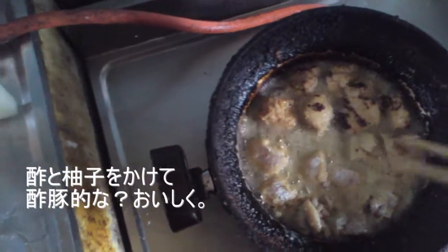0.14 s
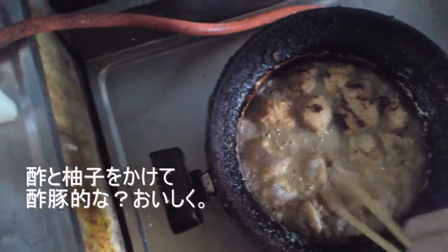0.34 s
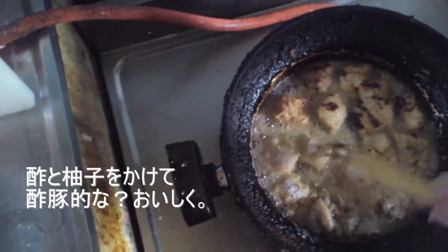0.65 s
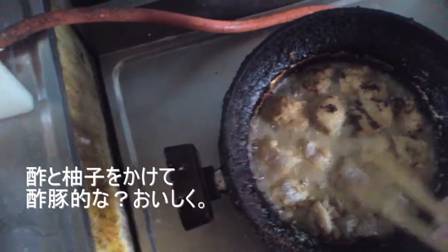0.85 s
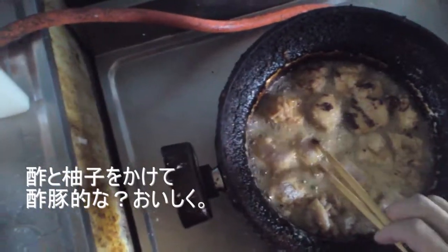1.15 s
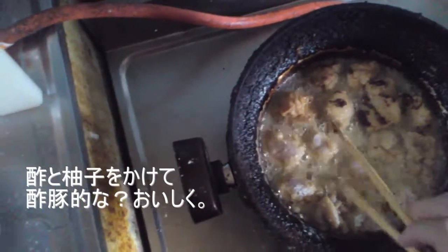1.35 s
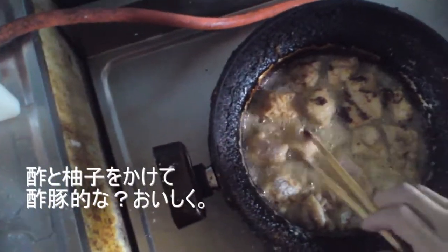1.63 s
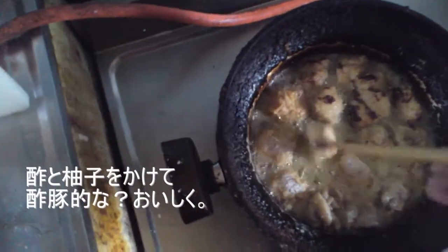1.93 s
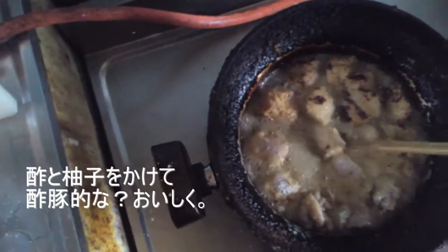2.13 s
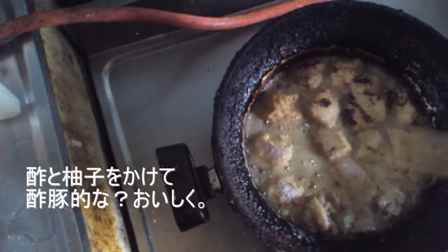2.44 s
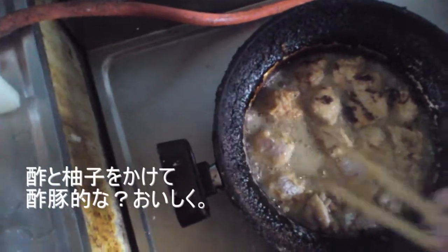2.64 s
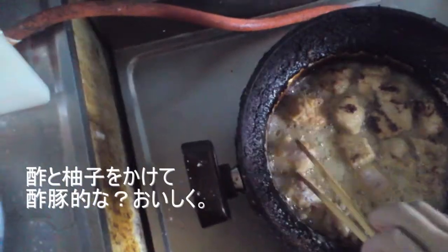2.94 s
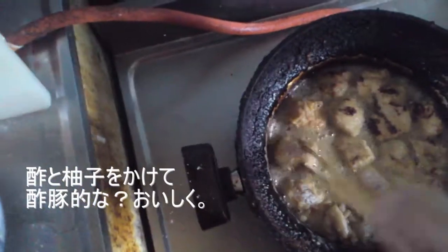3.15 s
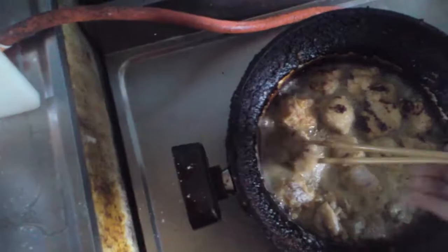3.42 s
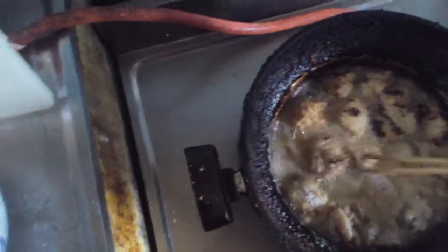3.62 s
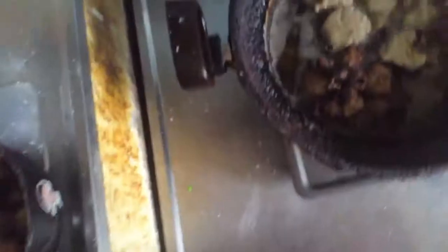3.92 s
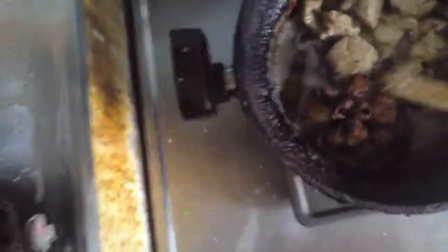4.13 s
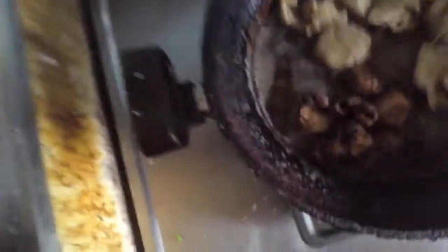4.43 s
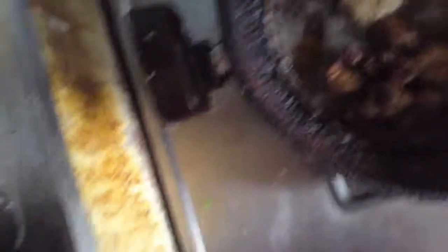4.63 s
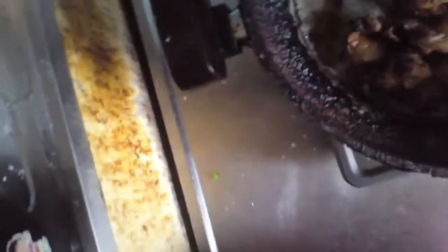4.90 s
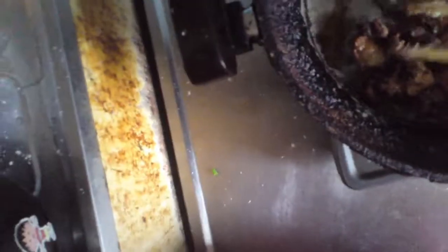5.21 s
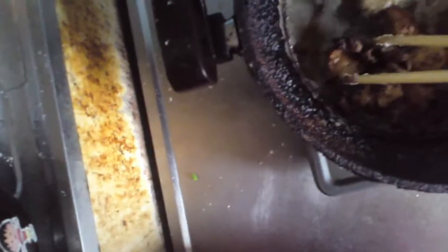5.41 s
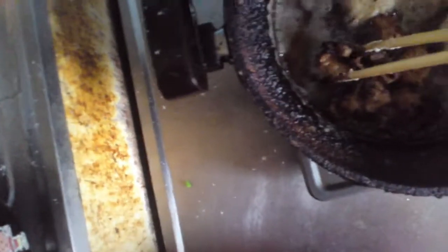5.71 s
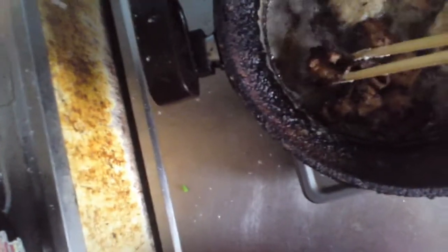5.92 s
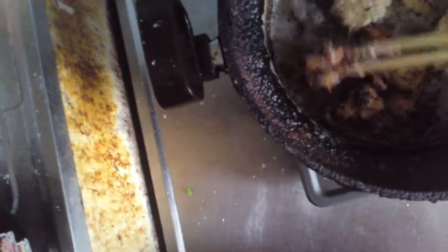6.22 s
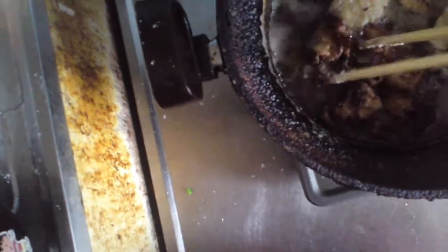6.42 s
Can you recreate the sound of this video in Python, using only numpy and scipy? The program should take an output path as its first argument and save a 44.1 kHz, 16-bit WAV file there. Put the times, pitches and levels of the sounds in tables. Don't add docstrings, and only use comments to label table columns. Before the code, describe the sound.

Battered chicken pieces fry in a pot of hot oil, heard close in a small kitchen. A dense, smooth, steady fizz runs first, with soft low bumps and small knocks from the hand holding the camera. It stops abruptly for about half a second of silence, then a rougher, louder boil enters, with clumped crackle, ringing bubble pops, sharp spits and faint plastic crinkles. Handheld camera microphone, nearly mono, dull at the very top.

```python
import sys
import numpy as np
from scipy import signal
from scipy.io import wavfile
from scipy.ndimage import uniform_filter1d

SR = 44100
rng = np.random.default_rng(int(sys.argv[2]) if len(sys.argv) > 2 else 0)


def wav_out(sig):
    wavfile.write(sys.argv[1], SR, np.round(np.clip(np.atleast_2d(sig).T, -1, 1) * 32767).astype(np.int16))


def linear_from_db(decibels):
    return 10 ** (np.asarray(decibels, float) / 20)


N = 289296
T = np.arange(N) / SR

# start t/s, end t/s
SHOTS = [(0, 3.9152), (4.4718, 6.6)]
# t/s, level/dB
BOIL = [
    [(0, -42), (0.7, -41.5), (1.8, -41), (2.05, -40.5), (2.7, -41.2), (3.3, -40), (3.92, -41)],
    [(4.47, -34.5), (4.66, -36), (4.84, -37.5), (5.0, -39), (5.41, -38.5), (5.7, -39.5), (5.88, -38),
     (6.15, -40), (6.45, -37), (6.56, -39.5)],
]
# usual level/dB, body over it/dB, treble over it/dB,
# share of a swell the body follows (0-1), share the treble follows (0-1)
BALANCE = [(-41.5, -10.5, -0.47, 0.4, 0.1), (-38, -7.5, -2.5, 0.96, 0.4)]
# f/Hz, density level/dB
FIZZ_SPECTRUM = [
    [(150, -55), (250, -6.5), (405, -8), (443, -0.5), (555, -4.5), (784, -8), (1120, -1.5), (1180, -2.5),
     (1450, -4), (2610, 0), (3040, 0.5), (3750, 4), (5620, 0.5), (8570, 2), (9100, -2.5), (11800, -33),
     (20000, -120)],
    [(150, -42.5), (250, -23.5), (405, -14), (555, -9.5), (598, -3.5), (665, -7.5), (911, -5.5),
     (1030, -11.5), (1330, -6.5), (1660, -5), (2350, 0), (3800, 1.5), (6060, -1.5), (8570, 0), (9100, -3),
     (11800, -42), (20000, -120)],
]
# rate/(1/s), size spread/dB, clumping/dB, share of smooth hiss (0-1),
# crackle rate/(1/s), crackle level/dB
BUBBLES = [(8900, 2, -0.46, 0.7, 480, -14.5), (5000, 3, 1.5, 0.44, 700, -2.5)]
# f/Hz, width/Hz, level/dB
POT_MODES = [(620, 40, 2), (740, 110, 3), (957, 46, 5), (1189, 38, 5.5), (1349, 130, 4), (2600, 180, 1),
             (3120, 250, -2.5), (3630, 480, 0.5), (4350, 60, 0)]
# t/s, peak level/dB, f/Hz, ring length/cycles
POPS = [(4.4776, -20, 4100, 2.1), (4.5088, -24, 4070, 2.9), (4.5259, -23, 5500, 1.8),
        (4.5447, -22, 3720, 1.7), (4.5998, -16.5, 4020, 2.3), (4.6494, -19, 2350, 2.36),
        (4.6571, -26, 2480, 1.3), (4.681, -19, 4610, 1.5), (4.6927, -19, 3700, 1.9),
        (4.7299, -24, 2680, 3.2), (4.763, -19.5, 3150, 3.3), (4.7687, -26, 2040, 3.3),
        (4.7975, -26, 2470, 1.3), (4.8916, -26, 2090, 1.9), (4.8971, -24, 1980, 1.8),
        (4.9102, -15.5, 3340, 2.1), (4.9429, -23, 4800, 1.6), (5.0444, -22, 3420, 2.3),
        (5.0583, -22, 3440, 2.1), (5.1181, -25, 3340, 2.2), (5.4227, -24.5, 2200, 4.3),
        (5.4639, -20, 2370, 3.1), (5.4821, -26.5, 2380, 2.9), (5.7644, -18.5, 2630, 0.77),
        (5.9941, -28, 2950, 2.4), (6.0073, -26.5, 2800, 2.2), (6.0948, -22, 2420, 1.4),
        (6.2526, -26.5, 2620, 2.9), (6.422, -27, 3520, 2.2), (6.4492, -28, 2240, 2.3)]
# t/s, peak level/dB, f/Hz
PIPS = [(4.4725, -25.5, 3570), (4.5721, -26, 3750), (4.594, -27, 2400), (4.61, -20.5, 3630),
        (4.6724, -20.5, 3280), (4.7129, -26, 3210), (4.805, -30, 2430), (5.0503, -23, 3720),
        (5.141, -27, 2100), (5.1633, -29, 2150), (5.5862, -32, 2600), (5.2217, -27.5, 1910),
        (5.2535, -25.5, 3960), (5.269, -26, 3920), (5.2994, -29, 2330), (5.4726, -23, 4160),
        (5.532, -23, 3870), (5.5787, -26, 3720), (5.6973, -25, 8000), (5.7395, -20, 8820),
        (5.88, -20, 8770), (5.956, -28, 2730), (5.9867, -25, 6600), (6.041, -26, 4040), (6.14, -25, 3980),
        (6.2661, -23, 3900), (6.3422, -23, 7400), (6.3756, -23, 8600), (6.466, -25, 8050),
        (6.4807, -28, 2340)]
# t/s, peak level/dB
SPITS = [(4.4768, -12), (4.5073, -18), (4.5436, -18), (4.571, -20), (4.5981, -23), (4.6774, -16),
         (4.5922, -28), (4.7612, -22), (4.9085, -17), (5.1204, -26), (5.1613, -23), (5.187, -5),
         (5.2516, -18), (5.286, -20.5), (5.3847, -15), (5.422, -15), (5.5768, -22), (5.6522, -23),
         (5.72, -7), (5.8392, -24), (5.9155, -10), (5.9535, -22), (5.9824, -27), (6.037, -26),
         (6.1386, -18), (6.2638, -26), (6.373, -13), (6.4184, -21), (6.4486, -0.5), (6.466, -17)]
# start t/s, length/s, level/dB
BAG = [
    (5.676, 0.1, -40.5),
    (5.82, 0.11, -50),
    (6.332, 0.18, -43.5),
]
# t/s, peak level/dB, f/Hz
BUMPS = [(0.0363, -62, 112), (0.4753, -40.5, 362), (1.0689, -62, 364), (2.498, -41.5, 80), (2.059, -47, 74),
         (2.1864, -46, 243), (2.3467, -40, 73.6), (2.3955, -45, 540), (2.463, -46.5, 200),
         (2.5082, -42, 537), (2.5567, -35, 164), (2.8082, -40.5, 138), (2.840, -34, 61.6),
         (2.9683, -46, 50), (3.0104, -41, 164), (3.1678, -45, 164), (3.519, -43, 107.5), (3.5531, -41, 110),
         (3.8002, -48.5, 156), (4.5415, -54, 111), (2.538, -38, 149), (5.0624, -51, 75), (5.171, -41, 800),
         (5.8751, -47, 73.6), (6.2345, -52, 74), (6.4855, -49, 106), (6.5093, -38, 173)]
# t/s, peak level/dB, f/Hz
KNOCKS = [(0.475, -38.5, 518), (1.068, -38.5, 511), (1.084, -40, 452), (1.551, -36.5, 921),
          (2.182, -37, 947), (2.359, -40, 554), (2.394, -38.5, 611), (2.461, -38, 581), (2.508, -38.5, 557),
          (2.537, -40, 554), (2.554, -38.5, 600), (2.819, -41, 576), (3.011, -48, 947), (3.634, -55.5, 552),
          (4.51, -33, 730), (5.141, -32, 800), (5.171, -30.5, 850), (5.22, -34, 740), (5.947, -31, 900)]
# t/s, level/dB
GRIP = [(0, -56), (2.2, -55), (2.38, -50.5), (2.55, -52), (2.85, -51.5), (3.05, -55), (3.5, -54.5),
        (3.8, -51.5), (3.92, -50.5), (4.47, -56.5), (5.6, -55.5), (6.56, -55.5)]
# f/Hz, density level/dB
RUMBLE = [(8.8, -26), (15, 2), (27, 1), (43, -5.5), (113, -7), (151, -8), (339, -17.5), (400, -19.5),
          (520, -31.5), (880, -120)]
# f/Hz, side level re mid/dB
SPREAD = [(60, -27.5), (400, -17.5), (1000, -19.5), (2000, -15), (3200, -15), (4500, -14.5), (9000, -14.5)]
# f/Hz, share of cells kept (0-1)
SIDE_KEPT = [
    [(60, .35), (430, .45), (1400, .38), (2000, .58), (3350, .55), (3450, .03), (4700, .02), (5300, 0),
     (9000, .01)],
    [(60, .4), (800, .22), (1900, .45), (2200, .16), (3300, .14), (3900, .04), (4800, .09), (5400, .02),
     (9000, .01)],
]
# f/Hz, share of cells dropped (0-1)
MID_GAPS = [(300, .004), (1300, .008), (1700, .05), (2500, .02), (3100, .07), (3600, .01), (4200, .14),
            (4850, .17), (5300, .025), (9000, .012)]

SURGE_DB, SURGE_S = 0.26, 0.03
SMALL_COUNT = 60
SMALL_OVER_DB, SMALL_SPREAD_DB = 4, 3
SMALL_HZ, SMALL_OCTAVES, SMALL_CYCLES = 3700, 0.3, 1.2
PIP_CYCLES = 1.9
CREASES_PER_S, CREASE_SPREAD_DB, CREASE_HZ = 1700, 6, 6800
TAIL_S, TAIL_DB = 0.06, -6.5
CAMERA_TOP_HZ = 9135
CUT_S = 0.0004


def evened(x):
    return x / np.sqrt(np.mean(x ** 2) + 1e-20)


def read(points, hz):
    f, value = np.transpose(points)
    return np.interp(np.log(hz + 1), np.log(f + 1), value)


def coloured(x, db_at):
    hz = abs(np.fft.fftfreq(8192, 1 / SR))
    log_gain = np.log(linear_from_db(np.maximum(db_at(hz), -100)))
    taps = np.fft.ifft(np.exp(np.conj(signal.hilbert(log_gain)))).real[:4096]
    return signal.oaconvolve(x, taps)[:N]


def band_rms(x, lo_hz, hi_hz):
    band = signal.butter(4, [lo_hz, hi_hz], "band", fs=SR, output="sos")
    return np.sqrt(np.mean(signal.sosfilt(band, x) ** 2))


def drift(span_s):
    size = int(span_s * SR)
    once = uniform_filter1d(rng.standard_normal(N), size)
    return evened(uniform_filter1d(once, size))


def sparse_snaps(per_s, spread_db, limit):
    size = linear_from_db(spread_db * np.minimum(rng.exponential(1, N), limit))
    return size * (rng.random(N) < per_s / SR)


def burst(hz, cycles, glide):
    u = np.arange(int(6 * cycles * SR / hz) + 8) / SR * hz / cycles
    shape = u ** 0.57 * np.exp(-1.3 * u)
    return shape / shape.max() * np.sin(2 * np.pi * cycles * (u + glide * u ** 2))


def strike(rows, length, glide, tick_db, lead):
    out = np.zeros(N + SR)
    chance = rng.standard_normal((len(rows), 64))
    for (s, db, hz, *cycles), noise in zip(rows, chance):
        cycles = length * np.prod(cycles)
        sound = burst(hz, cycles, glide)
        at = int((s - lead * cycles / hz) * SR)
        out[at:at + len(sound)] += linear_from_db(db) * sound
        out[at:at + 64] += linear_from_db(db + tick_db) * noise * np.exp(-np.arange(64) / 16.0)
    return out[:N]


def kitchen(x):
    t, out = np.arange(5000) / SR, x.copy()
    spot = (np.arange(N) // 700) % 8
    tails = rng.standard_normal((8, len(t))) * linear_from_db(-60 * t / TAIL_S) * (t > .0012)
    for k, tail in enumerate(tails):
        out += linear_from_db(TAIL_DB) * signal.oaconvolve(x * (spot == k), tail / np.linalg.norm(tail))[:N]
    return out


def cells(frames, band, count):
    chance = uniform_filter1d(rng.standard_normal((band.max() + 1, frames)), count, axis=1)
    return (chance.argsort(1).argsort(1) / frames)[band]


def camera_masking(mid, side, kept):
    hz, t, (mid, side) = signal.stft(np.array([mid, side]), SR, nperseg=1024, noverlap=768)
    narrow = (hz / 130).astype(int)
    wide = (9 * np.log(1 + hz / 600)).astype(int)
    mid *= np.where(cells(len(t), narrow, count=7) < read(MID_GAPS, hz)[:, None], 0, 1)
    side *= cells(len(t), wide, count=14) < read(kept, hz)[:, None]
    ports = np.array([mid + side, mid - side]) * (hz < CAMERA_TOP_HZ)[:, None]
    return signal.istft(ports, SR, nperseg=1024, noverlap=768)[1][:, :N]


def grip_rumble():
    grip_db = np.interp(T, *np.transpose(GRIP))
    rumble = evened(coloured(rng.standard_normal(N), lambda hz: read(RUMBLE, hz)))
    return linear_from_db(grip_db + 2.2 * drift(0.057)) * rumble


def hand_bumps():
    return linear_from_db(1.7) * strike(BUMPS, length=0.44, glide=-.03, tick_db=4.0, lead=.6)


def shell_knocks():
    upper_rows = np.array(KNOCKS) * [1, 1, 1.7]
    lower = -linear_from_db(-2.0) * strike(KNOCKS, length=1.6, glide=-0.014, tick_db=-19.5, lead=0.062)
    upper = linear_from_db(-8.0) * strike(upper_rows, length=1.6, glide=-.02, tick_db=-8.5, lead=.05)
    return lower + upper


def bag():
    snaps = sparse_snaps(CREASES_PER_S, CREASE_SPREAD_DB, 3)
    creases = snaps * rng.choice([-1, 1], N) * linear_from_db(2.8 * drift(0.0095))
    film = signal.oaconvolve(creases, burst(CREASE_HZ, 0.88, 0.046))[:N]
    squeeze = np.zeros(N)
    for s, length, db in BAG:
        squeeze += linear_from_db(db) * np.sin(np.pi * np.clip((T - s) / length, 0, 1)) ** .5
    return squeeze * evened(film)


def spits():
    out, t = np.zeros(N + SR), np.arange(160) / SR
    for (s, db), noise in zip(SPITS, rng.standard_normal((len(SPITS), 161))):
        tick = linear_from_db(-60 * t / 0.0087) * (noise[1:] - 0.69 * noise[:-1])
        at = int(s * SR)
        out[at:at + 160] += linear_from_db(db + 3.0) * tick / np.linalg.norm(tick)
    return signal.sosfilt(signal.butter(2, 900, "high", fs=SR, output="sos"), out[:N])


def small_pops():
    place, size, pitch, ring = rng.random((SMALL_COUNT, 4)).T
    start, end = BOIL[1][0][0], BOIL[1][-1][0]
    s = start + (end - start) * (np.arange(SMALL_COUNT) + place) / SMALL_COUNT
    boil_db = np.interp(s, *np.transpose(BOIL[1]))
    db = boil_db + SMALL_OVER_DB + SMALL_SPREAD_DB * (2 * size - 1)
    hz = SMALL_HZ * 2 ** (SMALL_OCTAVES * 2 * (2 * pitch - 1) ** 3)
    return list(zip(s, db, hz, SMALL_CYCLES * (.5 + ring)))


def bubble_pops():
    pips = [(*row, PIP_CYCLES) for row in PIPS]
    return strike(POPS + pips + small_pops(), length=1.1, glide=0.013, tick_db=-12, lead=0.6)


def pot_db(hz):
    return sum(db / (1 + (2 * (hz - f) / width) ** 2) for f, width, db in POT_MODES)


def fizz(spectrum, per_s, spread_db, clump_db, hiss, crackles_per_s, crackle_db):
    clumps = linear_from_db(clump_db * drift(0.0069))
    size = sparse_snaps(per_s, spread_db, 5)
    kind, bubbles = rng.integers(0, 24, N), np.zeros(N)
    for k, hz in enumerate(np.geomspace(300, 10000, 24)):
        grain = burst(hz, 1.53, 0.064)
        grain = grain / np.linalg.norm(grain) * np.sqrt(hz)
        bubbles += signal.oaconvolve(size * (kind == k), grain)[:N]
    snaps = sparse_snaps(crackles_per_s, 5.0, 3) * rng.choice([-1, 1], N)
    snaps = linear_from_db(crackle_db) * evened(snaps)
    bubbles = kitchen((evened(bubbles) + snaps) * clumps)
    smooth = rng.standard_normal(N) * np.sqrt(clumps)
    mix = np.sqrt(1 - hiss) * evened(bubbles) + np.sqrt(hiss) * smooth
    return coloured(mix, lambda hz: read(spectrum, hz) + pot_db(hz))


def frying(boil, balance, spectrum, bubbles):
    usual_db, body_db, treble_db, body_share, treble_share = balance
    swell_db = np.interp(T, *np.transpose(boil)) - usual_db + SURGE_DB * drift(SURGE_S)
    oil = fizz(spectrum, *bubbles)
    oil = oil / band_rms(oil, 2000, 6000)
    body = signal.sosfiltfilt(signal.butter(2, 1900, fs=SR, output="sos"), oil)
    treble = signal.sosfiltfilt(signal.butter(2, 6200, "high", fs=SR, output="sos"), oil)
    middle = (oil - body - treble) * linear_from_db(swell_db)
    body = body * linear_from_db(body_db + body_share * swell_db) / band_rms(oil, 450, 1800)
    treble = treble * linear_from_db(treble_db + treble_share * swell_db) / band_rms(oil, 6370, 9000)
    return linear_from_db(usual_db) * (middle + body + treble)


def scene():
    pops = kitchen(bubble_pops() + spits() + bag())
    handling = hand_bumps() + shell_knocks()
    ports = np.zeros((2, N))
    for (t0, t1), boil, balance, spectrum, bubbles in zip(SHOTS, BOIL, BALANCE, FIZZ_SPECTRUM, BUBBLES):
        near = frying(boil, balance, spectrum, bubbles) + grip_rumble() + pops
        side = coloured(np.roll(near, 1500), lambda hz: read(SPREAD, hz))
        mid = near + handling
        ports += ((T > t0) & (T < t1)) * np.array([mid + side, mid - side])
    return ports


def roll_off(x):
    return signal.sosfilt(signal.butter(12, 10340, fs=SR, output="sos"), x)


def record(dry):
    mid, side = (dry[0] + dry[1]) / 2, (dry[0] - dry[1]) / 2
    mix = np.zeros_like(dry)
    for (t0, t1), kept in zip(SHOTS, SIDE_KEPT):
        since_start = T - t0 + CUT_S * (t0 == 0)
        edge = np.clip(np.minimum(since_start, t1 - T) / CUT_S, 0, 1)
        mix += np.sin(np.pi / 2 * edge) ** 2 * camera_masking(mid, side, kept)
    return roll_off(mix)


dry = scene()
out = record(dry)
wav_out(out)
```